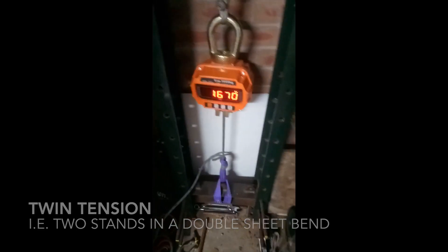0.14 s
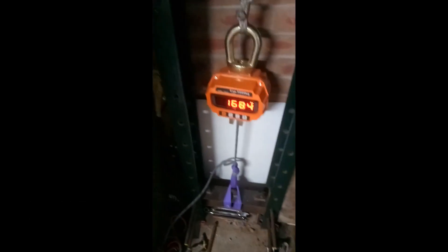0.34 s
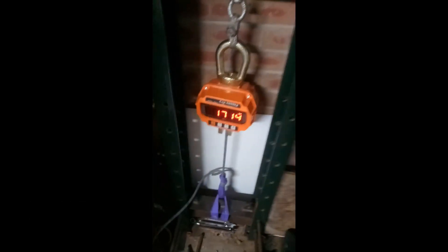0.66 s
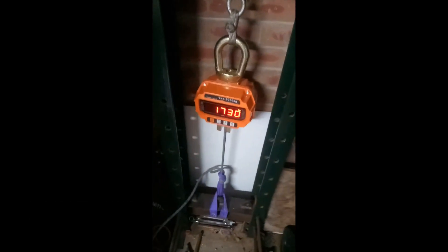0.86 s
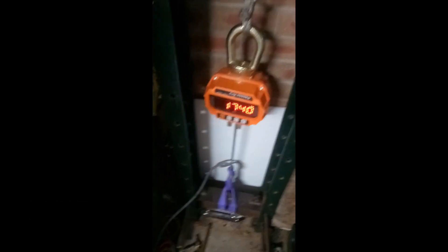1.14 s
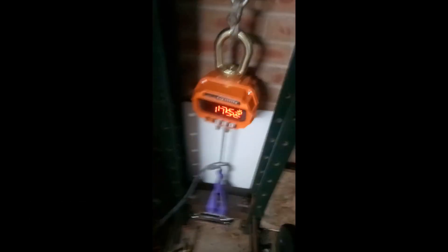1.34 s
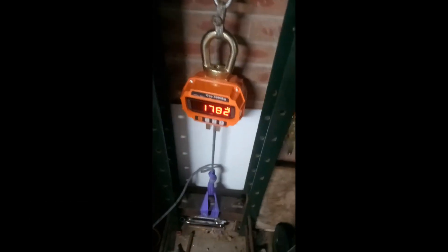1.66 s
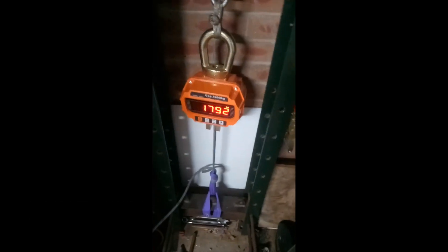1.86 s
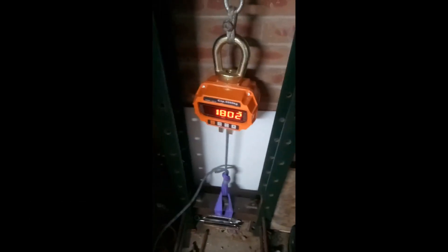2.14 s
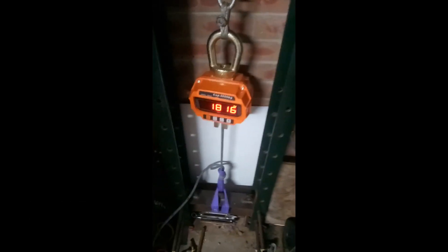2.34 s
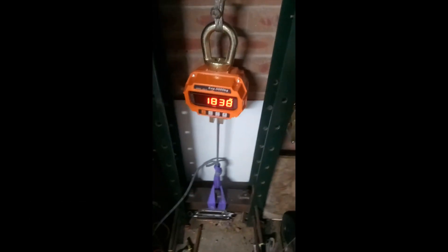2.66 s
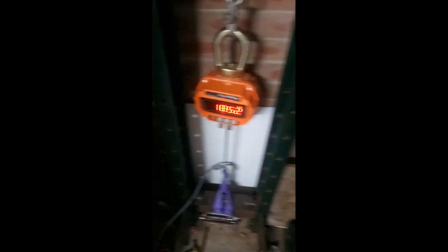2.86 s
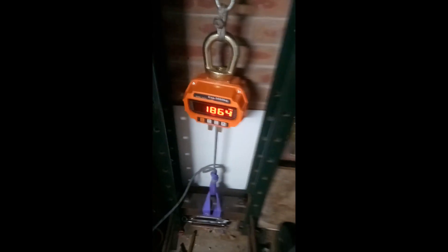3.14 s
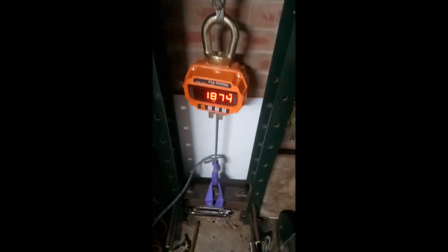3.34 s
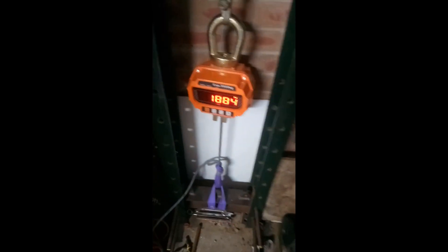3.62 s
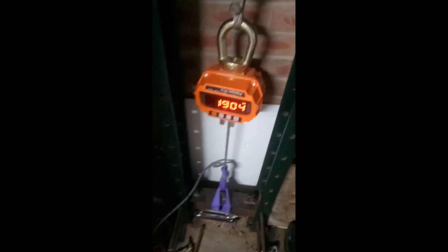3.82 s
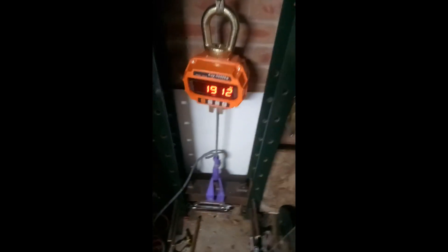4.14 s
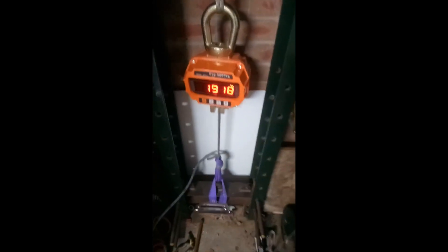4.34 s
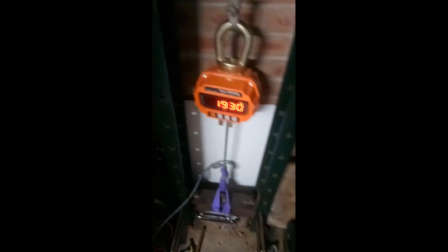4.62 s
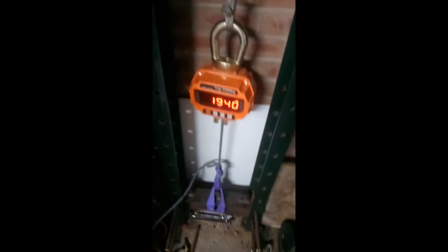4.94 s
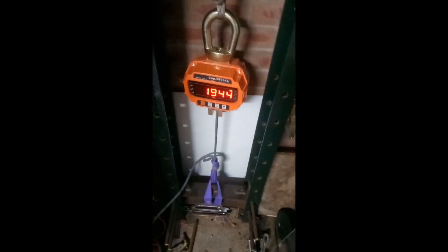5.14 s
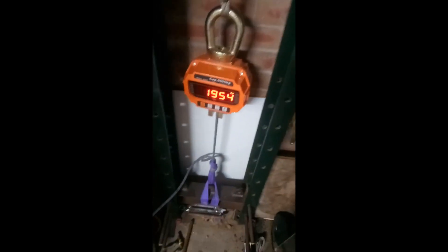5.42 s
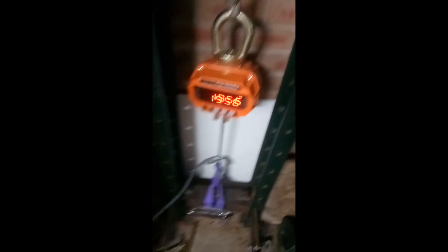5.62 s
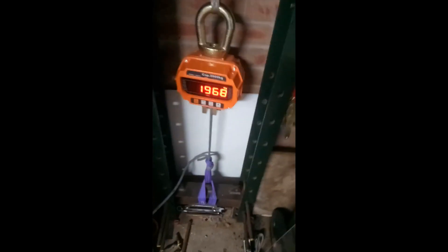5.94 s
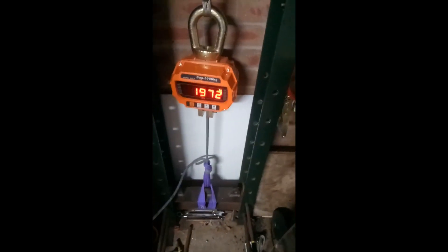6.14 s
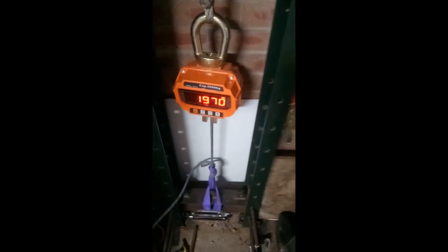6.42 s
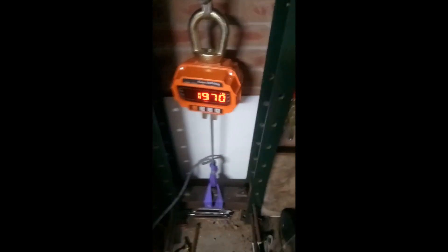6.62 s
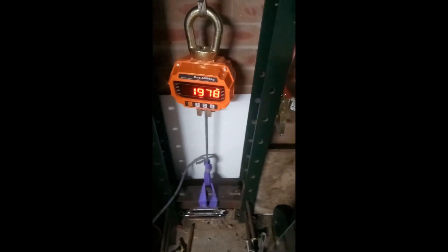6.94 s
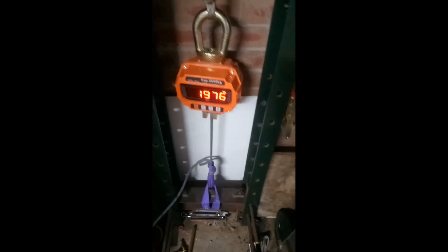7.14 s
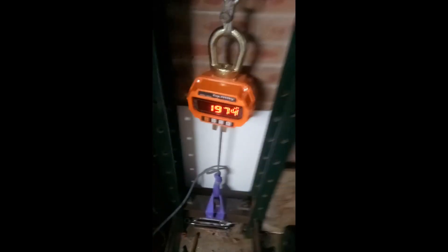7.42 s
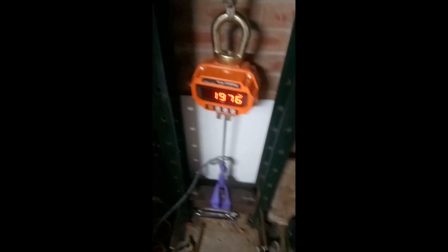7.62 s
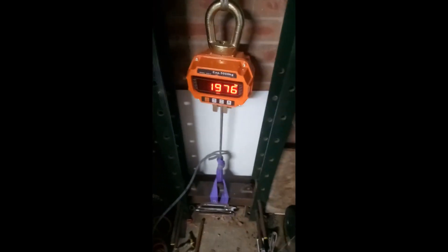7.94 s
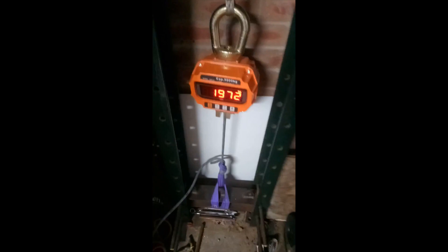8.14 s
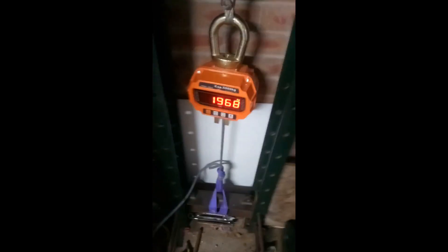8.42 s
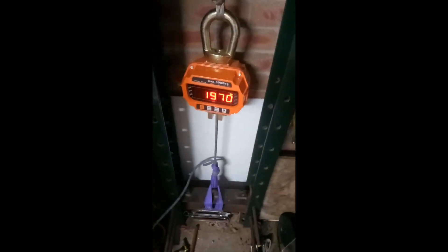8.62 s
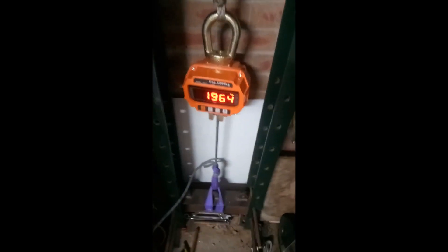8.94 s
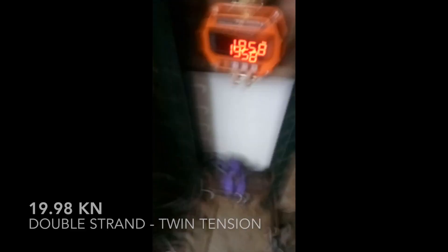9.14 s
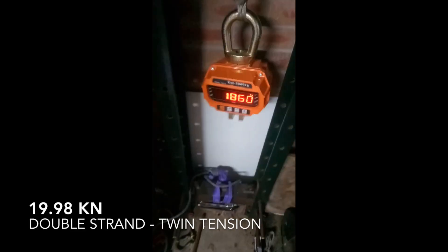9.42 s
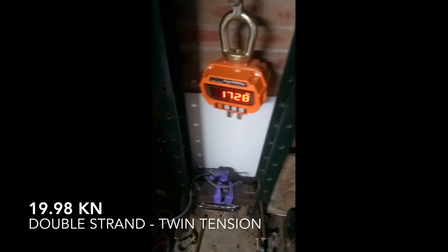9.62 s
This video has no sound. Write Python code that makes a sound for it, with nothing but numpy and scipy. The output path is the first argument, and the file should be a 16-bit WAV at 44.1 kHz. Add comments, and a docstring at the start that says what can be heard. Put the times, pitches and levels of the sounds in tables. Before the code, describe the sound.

A hand lever tensioner thuds and ticks steadily in a brick workshop, strained rope cracks, then it snaps with a huge overloaded metallic crash.

```python
"""Brick workshop, close stereo: from the start a lever tensioner is pumped, its handle thudding at each stroke.
In between pawls and chain tick (struck dying sines), metal rubs and scrapes (shaped noise), a pivot squeaks.
From 1.3 s strands of the loaded rope crack (noise bursts that ring pawl and frame); the first shakes a steel part.
At 9.1 s the rope breaks: the steel rig crashes, bounces and rings (noise swells and sines), overloading the input."""
import sys
import numpy as np
from scipy import signal
from scipy.io import wavfile
from scipy.ndimage import uniform_filter1d

SR = 44100
rng = np.random.default_rng(int(sys.argv[2]) if len(sys.argv) > 2 else 0)


def master(y):
    """Save y as 16-bit WAV."""
    cut = np.clip(np.atleast_2d(y).T, -1, 1)
    pcm = np.round(cut * 32767)  # scale
    wavfile.write(sys.argv[1], SR, pcm.astype(np.int16))


N = 430857  # length [samples]

# Low rumble. Each row of the spectrum: frequency in Hz, level in dB per Hz.
RUMBLE_SPECTRUM = [(30, -30), (45, 1.5), (100, 3), (160, 2), (260, -57)]
# Course of the rumble. Each row: time in seconds, level in dB.
RUMBLE_LEVEL = [(1.2, -56.5), (2.3, -53.5), (2.7, -70), (5, -60)]
HISS_DB = -97

# Steady rubbing of the lever under load. Each row: time in seconds, level in dB.
LOAD = [(0, -50.5), (.9, -55), (1.8, -52.5), (2.45, -58.5), (3.3, -51.5), (4.3, -54.5), (6.05, -58),
        (7.2, -53), (8.3, -52.5), (9.1, -60.5)]
# Dull part of the rubbing. Each row: frequency in Hz, level in dB per Hz.
RUB_SPECTRUM = [(150, -12.5), (300, -0.5), (414, 6), (683, -8.5), (845, 1.5), (1180, -6.5), (1480, 1.5),
                (1900, -8.5), (4000, -68)]
# Gritty part of the rubbing. Each row: frequency in Hz, level in dB per Hz.
GRIT_SPECTRUM = [(1500, -4), (2300, -1), (2900, -4), (3650, -3), (4480, -1), (5200, -15), (9000, -38)]
# The scraped metal sings. One row: frequency in Hz, sharpness (Q), level in dB.
GRIT_RING = 3655, 25, 2
# Gritty scrapes of metal over metal. Each row: start in seconds, rise in seconds, length in seconds, level in dB.
SCRAPES = [(0, 0.086, 0.041, -39.5), (1.197, 0.062, 0.36, -43), (4.59, 0.099, 0.29, -52),
           (6.768, 0.072, 0.41, -56.5)]
GRIT_BELOW_DB = -8  # grit of the steady rubbing, against its dull part
SCRAPE_DULL_DB = 0.5  # dull part of a scrape, against its grit
RASP_DB = 5  # extra singing added during a scrape

# Squeaks of the pivot. Each row: start in seconds, length in seconds, first pitch in Hz, rise in Hz per second,
# level in dB.
SQUEAKS = [(0.463, 0.074, 792, 1580, -59), (3.068, 0.085, 891, 330, -55.5), (8.069, 0.038, 980, 500, -57)]

# The handle lands on its stop once a stroke, and is jolted by the first crack.
# Each row: start in seconds, frame level in dB.
THUDS = [(0.189, -30), (1.024, -29), (1.348, -29.5), (1.873, -30), (2.733, -31), (3.566, -32.5),
         (4.435, -29.5), (5.326, -32), (6.235, -30.5), (7.111, -30.5), (8.013, -31.5), (8.94, -31)]
# Ticks of pawl and chain. Each row: start in seconds, pawl level in dB, frame level in dB, colour in Hz.
TICKS = [(0.042, -39, -36.5, 3560), (0.085, -25, -31.5, 4250), (0.296, -51.5, -63, 3550),
         (0.366, -62, -41.5, 1500), (0.4567, -48, -52, 1910), (0.6018, -34.5, -36, 3750),
         (1.002, -39.5, -39.5, 3030), (1.214, -35, -41, 1920), (2.1533, -39.5, -41.5, 3800),
         (2.2809, -35, -38.5, 1640), (2.506, -44, -76, 3630), (3.001, -41, -50, 1740),
         (3.1149, -30, -39, 3860), (3.3164, -41.5, -57, 3380), (3.6338, -44, -69, 3800),
         (3.721, -45, -61, 3800), (3.796, -40.5, -38.5, 2290), (3.8732, -33, -54, 4020),
         (3.9816, -36.5, -36, 1940), (4.19, -48, -70, 3500), (4.309, -62, -50, 3860),
         (4.412, -41.5, -36.5, 3200), (4.8569, -43, -37, 3740), (5.641, -37.5, -53, 4160),
         (5.7488, -40.5, -40.5, 3820), (5.964, -49, -56, 3500), (6.201, -77, -41.5, 2260),
         (6.654, -34, -37.5, 1660), (6.8546, -42.5, -55, 3630), (7.168, -39, -41.5, 3930),
         (7.5559, -38, -37.5, 3660), (8.0682, -36, -43, 3680), (8.462, -39.5, -36, 3660),
         (8.66, -51, -64, 3570)]
# Modes of the frame. Each row: frequency in Hz, level in dB, t60 in seconds (pitch and level vary per blow).
FRAME_MODES = [(184.5, -2, 0.14), (243.7, -2, 0.14), (412, 5, 0.19), (755, -2, 0.063), (1117, 11.5, 0.013),
               (1395, 19, 0.018), (1585, 10, 0.021)]
# Modes of the pawl. Each row: frequency in Hz, level in dB, t60 in seconds (pitch and level vary per blow).
PAWL_MODES = [(2127, 20, 0.015), (2380, -13, 0.0285), (3595, -2.5, 0.28), (3604, 28.5, 0.005),
              (4250, 8.5, 0.03), (3600, 8, 0.11)]
THUD_PAWL_DB, THUD_HZ = -11.5, 3180  # pawl against the frame in a thud, and its colour
THUD_S, TICK_S = 0.0051, 0.0065  # time scales of the contact rattles [s]
THUD_SOFT, TICK_SOFT = 0.6, 0.2  # how gradually the contacts start (exponent)
BODY_DB, BODY_RISE_S = -8, 0.004  # the handle's full weight also sets off the two lowest frame modes

# Sharp cracks of rope strands. Each row: time in seconds, rms level in dB, colour in Hz,
# slipping fibres in dB against the crack (before the fixed slip weights).
CRACKS = [(1.342, -37, 3800, -18), (5.516, -38, 3550, -29), (7.7187, -34.5, 3670, -15),
          (7.925, -49, 3800, -39), (8.7722, -36.5, 3730, -15), (8.844, -43, 4130, -26),
          (8.9977, -40.5, 3520, -20.5)]
CRACK_TREBLE_DB, CRACK_SPIKY_DB = -25, 5.5  # treble against the crack; unevenness of the snapping fibres
# The first crack shakes a steel part, which rattles and rings.
# One row: start in seconds, level in dB, decay of the rattle in seconds.
CLANK = 1.345, -31.5, 0.022
# Modes of that steel part. Each row: frequency in Hz, level in dB, t60 in seconds.
STEEL_MODES = [(2875, -8, .22), (3655, -3, .28), (4226, 2, .7), (4430, -1, .2), (4662, -1, .24)]

# The break, then the freed rig bouncing. Each row: start in seconds, rise in seconds, length in seconds,
# clatter level in dB, bass level in dB.
BOUNCES = [(9.121, 0.0065, 0.15, 0, -8), (9.38, 0.051, 0.054, -12.5, -21), (9.528, 0.02, 0.062, -23.5, -29)]
# Clatter of the rig. Each row: frequency in Hz, level in dB per Hz.
CLATTER_SPECTRUM = [(290, -47), (500, -24.5), (1230, -7.5), (1420, 0.5), (1950, -5), (2910, -2.5),
                    (4540, -0.5), (8170, -26), (15400, -40.5)]
# Boom of the rig. Each row: frequency in Hz, level in dB per Hz.
BOOM_SPECTRUM = [(25, -54), (81, -10), (306, -3), (487, -7.5), (1170, -8.5), (1980, -120)]
# Resonances of the chain links. Each row: frequency in Hz, width in Hz, level in dB.
LINKS = [(2300, 20, -5), (2730, 30, -1), (3290, 25, -8), (4130, 35, -6), (4850, 35, -1)]
# Rings of shackle and hook. Each row: frequency in Hz, level in dB, t60 in seconds, struck at in seconds.
RINGS = [(1400, -29, 8, 9.45), (4404, -9, .7, 9.15), (4398, -30, 3, 9.56), (6153, -37, 8, 9.42),
         (8775, -52, 8, 9.33)]
# Single loose parts struck in the crash. Each row: start in seconds, level in dB, frequency in Hz, t60 in seconds.
CLINKS = [(9.268, -5, 4970, 0.084), (9.545, -23, 4540, 0.53), (9.729, -31, 3280, 0.076)]
FADE_DB, FADE_POWER = -11.5, 2.32  # loss of a swell after one length, and how late it comes
BASS_RISE_S = 0.024  # longest rise of the bass; also the rise of the loose rattle
RATTLE_DB, RATTLE_BASS_DB, RATTLE_DB_PER_S = -17.5, -24.5, -27  # loose parts rattle on under the bounces
RING_SWELL_S, RING_WAVER_DB, RING_LEFT_DB = .2, 2.5, 2
RIG_LEFT_DB = 3  # boom and tones: left up, right down by this

# Room decay. Each row: frequency in Hz, t60 in seconds.
ROOM = [(200, 0.44), (700, 0.33), (2760, 0.22), (7280, 0.16)]
# Microphone response, used on lever, squeaks and rope. Each row: frequency in Hz, gain in dB.
MIC = [(60, 2), (4800, 5.5), (6000, -3), (8000, -9.5), (15500, -6.5)]
LEVER_LAG, ROPE_LAG = 16, -2  # delay of the left channel [samples]
EDGE_HZ = 15500  # band limit of the recorder


def gain_of(db):
    """Amplitude factor of a level in dB."""
    return 10 ** (np.asarray(db) / 20)


def evened(x):
    """Scale to rms 1."""
    return x / np.sqrt(np.mean(x ** 2) + 1e-20)


def peaked(x):
    """Scale to peak 1."""
    return x / np.abs(x).max()


def read(points, hz):
    """Read a curve between its points on a log frequency axis."""
    f, value = np.transpose(points)
    return np.interp(np.log(hz + 1), np.log(f + 1), value)


def add(mix, s, sound):
    """Lay a sound into the mix at s seconds, cut at the end."""
    part = mix[round(s * SR):][:len(sound)]
    part += sound[:len(part)]


def together(levels):
    """Unrelated sounds add in power."""
    return np.sqrt(sum(level ** 2 for level in levels))


def swell(t, s, rise, length, db):
    """Rises in a straight line, holds, then drops away ever faster."""
    rise = max(rise, .001)
    late = np.clip(t - s - rise, 0, None) / max(length, .005)
    return np.clip((t - s) / rise, 0, 1) * gain_of(db + FADE_DB * np.minimum(late, 9) ** FADE_POWER)


def grainy(count, per_s, strength):
    """A gain that jumps at sparse small contacts of uneven size and dies back in a few ms; rms 1."""
    hits = (rng.random(count) < per_s / SR) * rng.exponential(1, count)
    return evened(1 + strength * signal.lfilter([1], [1, -np.exp(-1 / (0.0042 * SR))], hits))


def ringing(modes, t, detune):
    """Sum of dying sines; detune shifts pitch and strength of each mode, as a blow landing elsewhere does."""
    return sum(gain_of(db + 1.44 * d - 60 * t / t60) * np.sin(2 * np.pi * hz * (1 + 0.052 * d) * t)
               for (hz, db, t60), d in zip(modes, detune))


def band(x, hz, sharpness):
    """A two-pole resonance."""
    return signal.lfilter(*signal.iirpeak(min(hz, 15000), max(sharpness, .3), SR), x)


def noise(spectrum, same, patchy_db, size=512, count=N):
    """Stereo noise of a given spectrum with drifting patches; same is the left-right likeness; rms 1."""
    hop = size // 4
    frames, hz = count // hop + 5, np.fft.rfftfreq(size, 1 / SR)
    a, b, c, d, patches = rng.standard_normal((frames, len(hz), 5), dtype=np.float32).T
    patches = uniform_filter1d(patches, size=5, axis=0)
    patches = evened(uniform_filter1d(patches, size=16, axis=1))
    same = np.clip(same, -1, 1)
    left, other = a + 1j * b, c + 1j * d
    z = np.array([left, same * left + np.sqrt(1 - same ** 2) * other])
    z *= gain_of(read(spectrum, hz)[:, None] + patchy_db * patches)
    return evened(signal.istft(z, nperseg=size, noverlap=size - hop)[1][:, :count])


def room(x):
    """Three sparse tails a side, fed in turn; each band dies at its own speed."""
    at = np.arange(120, SR // 3 - 20, 20)
    out, turn = np.zeros((2, N)), np.arange(N) / SR * 2.1
    for k in range(3):
        taps = np.zeros((2, SR // 3))
        places = at + rng.integers(0, 20, (2, len(at)))
        np.put_along_axis(taps, places, rng.choice([-1., 1.], (2, len(at))), 1)
        hz, t, z = signal.stft(taps, SR, nperseg=256)
        tail = signal.istft(z * gain_of(-60 * t / read(ROOM, hz)[:, None]), SR, nperseg=256)[1]
        feed = x * np.sqrt(2 / 3) * np.cos(np.pi * (turn + k / 3))
        out += signal.oaconvolve(feed[None], tail / np.linalg.norm(tail[0]), axes=1)[:, :N]
    return out


def placed(x, left_db, lag, wet_db):
    """Direct sound, reaching the left port lag samples late (early if negative), plus the room."""
    direct = np.array([gain_of(left_db) * np.roll(x, lag), gain_of(-left_db) * x])
    return direct + gain_of(wet_db) * room(x)


def coloured(x):
    """The microphone loses treble above its resonance; causal response from the log gain."""
    log_gain = np.log(gain_of(read(MIC, abs(np.fft.fftfreq(4096, 1 / SR)))))
    taps = np.fft.ifft(np.exp(log_gain - 1j * signal.hilbert(log_gain).imag)).real[:1024]
    return signal.oaconvolve(x, taps[None], axes=1)[:, :N]


def background():
    """Rubbing and scraping metal as shaped noise, a lumpy low rumble and a faint hiss."""
    t = np.arange(N) / SR
    load = gain_of(np.interp(t, *np.transpose(LOAD)))
    scrape = together(swell(t, *row) for row in SCRAPES)
    rub_level = together([load, gain_of(SCRAPE_DULL_DB) * scrape])
    grit_level = together([gain_of(GRIT_BELOW_DB) * load, scrape])
    rumble_level = gain_of(np.interp(t, *np.transpose(RUMBLE_LEVEL)))
    rumble = rumble_level * noise(RUMBLE_SPECTRUM, 0.98, 5.2, size=2048)
    sand = noise(GRIT_SPECTRUM, 0.061, 2.5)
    ring_hz, sharpness, ring_db = GRIT_RING
    sing = gain_of(ring_db) * band(sand * grainy(N, 40, 4.4), ring_hz, sharpness)
    rub = rub_level * noise(RUB_SPECTRUM, 0.32, 5.35, size=1024)
    near = rub + grit_level * (sand + sing) + gain_of(RASP_DB) * scrape * sing + rumble
    hiss = gain_of(HISS_DB) * rng.standard_normal((2, N))
    return near * gain_of([[1.6], [-1.6]]) + hiss  # a little to the left


def squeaks():
    """Stick-slip in the pivot: a wavering, gliding tone with its octave."""
    out = np.zeros(N)
    for s, length, first_hz, rise_hz, db in SQUEAKS:
        count = round(length * SR)
        waver = 1 + 0.067 * evened(uniform_filter1d(rng.standard_normal(8000), size=200))[:count]
        glide_hz = first_hz + rise_hz * np.arange(count) / SR
        turn = 2 * np.pi * np.cumsum(glide_hz * waver) / SR
        tone = np.sqrt(2) * (np.sin(turn) + 0.5 * np.sin(2 * turn))
        add(out, s, gain_of(db) * tone * signal.windows.tukey(count, .4))
    return out


def knock(frame_db, pawl_db, hz, length, soft):
    """A short rattle of contacts: the pawl answers at once, the heavy frame swells up behind it."""
    t = np.arange(5000) / SR
    u = t[:2500] / max(length, .001)
    contacts = rng.standard_normal(len(u)) * gain_of(4.4 * rng.standard_normal(len(u)))
    sharp = contacts * u ** max(soft, 0) * np.exp(-1.3 * u)
    heavy = contacts * u ** 1.19 * np.exp(-u)
    pad = (0, len(t) - 1)
    detune = rng.standard_normal((2, 12))
    pawl = peaked(signal.fftconvolve(sharp, ringing(PAWL_MODES, t, 0.42 * detune[0])))
    click = peaked(band(band(np.pad(sharp, pad), hz, 11.3), hz, 0.87))
    tick = peaked(0.82 * pawl + click)
    frame = peaked(signal.fftconvolve(heavy, ringing(FRAME_MODES, t, 0.97 * detune[1])))
    dull = band(band(np.pad(heavy, pad), 590, 0.71), 590, 0.71)  # the blow itself, without a pitch
    thud = peaked(frame + 0.65 * peaked(dull))
    return gain_of(pawl_db) * tick + gain_of(frame_db) * thud


def lever():
    """The handle's weight lands on its stop and rings the frame; pawls and chain tick in between."""
    out, t = np.zeros(N), np.arange(6000) / SR
    for s, frame_db in THUDS:
        add(out, s, knock(frame_db, frame_db + THUD_PAWL_DB, THUD_HZ, THUD_S, THUD_SOFT))
        body = ringing(FRAME_MODES[:2], t, 0.5 * rng.standard_normal(2)) * np.minimum(t / BODY_RISE_S, 1)
        add(out, s, gain_of(frame_db + BODY_DB) * peaked(body))
    for s, pawl_db, frame_db, hz in TICKS:
        add(out, s, knock(frame_db, pawl_db, hz, TICK_S, TICK_SOFT))
    return out


def clank():
    """The steel part shaken by the first crack: each mode rung by a dying noise rattle."""
    out, t = np.zeros(N), np.arange(20000) / SR
    start, clank_db, rattle_s = CLANK
    for hz, db, t60 in STEEL_MODES:
        rattle = rng.standard_normal(4000) * np.exp(-t[:4000] / rattle_s)
        rung = signal.fftconvolve(rattle, ringing([(hz, 0, t60)], t, [0]))
        add(out, start, gain_of(clank_db + db) * peaked(rung))
    return out


def cracks():
    """A parting strand: a burst of a few ms and a fizz of fibres slipping after it, shaking pawl and frame."""
    out, t = np.zeros(N), np.arange(12000) / SR
    for s, db, hz, slip_db in CRACKS:
        fibres = rng.standard_normal(len(t)) * np.minimum(t / 0.0026, 1)
        burst = fibres * gain_of(CRACK_SPIKY_DB * rng.standard_normal(len(t))) * np.exp(-t / 0.0051)
        slip = gain_of(slip_db) * fibres * grainy(len(t), 130, 1.7) * np.exp(-t / 0.061)
        detune = rng.standard_normal((2, 12))
        pawl, frame = (peaked(signal.fftconvolve(burst[:900], ringing(modes, t, d))[:len(t)])
                       for modes, d in zip((PAWL_MODES, FRAME_MODES), detune))
        broad = band(band(burst + 0.54 * slip, hz, 0.53), hz, 0.53)
        narrow = band(burst + 1.9 * slip, hz, 7.4)
        treble = peaked(np.diff(burst, prepend=0))
        snap = peaked(broad + 1.2 * narrow) + gain_of(CRACK_TREBLE_DB) * treble
        add(out, s - .001, gain_of(db) * evened(snap + 0.17 * pawl + 0.12 * frame))
    return out


def rings(t):
    """Knocked shackle and hook: slowly swelling, wavering sines, different at each ear."""
    tones = np.zeros((2, len(t)))
    for (hz, db, t60, start), phase in zip(RINGS, rng.random((len(RINGS), 2, 1)) / 4):
        after = np.clip(t - start, 0, None)
        drift = rng.standard_normal((2, len(t)))
        waver = evened(signal.fftconvolve(drift, np.hanning(2000)[None], "same"))
        level_db = db - 60 * after / t60 + RING_WAVER_DB * waver + [[RING_LEFT_DB], [-RING_LEFT_DB]]
        rise = np.minimum(after / RING_SWELL_S, 1)
        tones += gain_of(level_db) * rise * np.sin(2 * np.pi * (hz * after + phase))
    return tones


def crash():
    """The freed rig: noise swells of clatter and boom, chain-link resonances, and ringing loose parts."""
    t = np.arange(round(BOUNCES[0][0] * SR), N) / SR
    rattle = np.minimum((t - t[0]) / BASS_RISE_S, 1) * gain_of(RATTLE_DB_PER_S * (t - t[0]))
    clatter_levels, bass_levels = [gain_of(RATTLE_DB) * rattle], [gain_of(RATTLE_BASS_DB) * rattle]
    for s, rise, length, clatter_db, bass_db in BOUNCES:
        clatter_levels.append(swell(t, s, rise, length, clatter_db))
        bass_levels.append(swell(t, s, min(rise, BASS_RISE_S), 0.55 * (rise + length), bass_db))
    tones = rings(t)
    for s, db, hz, t60 in CLINKS:
        after = np.clip(t - s, 0, None)
        tones += ringing([(hz, db, t60)], after, [0]) * np.minimum(after / 0.0028, 1)
    knocking = grainy(len(t), 270, 0.23)  # links strike one another
    clatter = noise(CLATTER_SPECTRUM, 0.0082, 2.84, size=256, count=len(t))
    jangle = together(clatter_levels) * knocking * clatter
    links = sum(gain_of(db) * band(jangle, hz, hz / width) for hz, width, db in LINKS)  # chain links ring on
    boom = together(bass_levels) * noise(BOOM_SPECTRUM, 0.1, 1.5, size=2048, count=len(t))
    middle = band(jangle, 1840, 0.44) * [[0.3], [-0.3]]  # more on the left, less on the right
    rig = jangle + 3.1 * links + middle + (boom + tones) * gain_of([[RIG_LEFT_DB], [-RIG_LEFT_DB]])
    return np.pad(rig, ((0, 0), (N - len(t), 0)))


def scene():
    """Lever and rope stand in the room before the microphone; background and crash are added in stereo."""
    tensioner = placed(lever() + squeaks(), 6.04, LEVER_LAG, 1.0)
    rope = placed(cracks() + clank(), 1.0, ROPE_LAG, -1.46)
    return coloured(tensioner + rope) + background() + crash()


def record(dry):
    """The input overloads, flattening the peaks; then the band limit."""
    clipped = np.clip(dry, -.97, .97)
    lowpass = signal.firwin(511, EDGE_HZ, window=("kaiser", 9), fs=SR)
    return signal.oaconvolve(clipped, lowpass[None], "same")


dry = scene()
out = record(dry)
master(out)
```